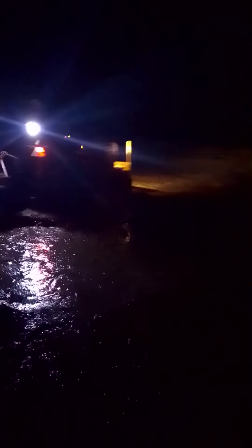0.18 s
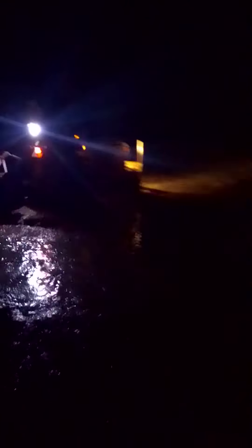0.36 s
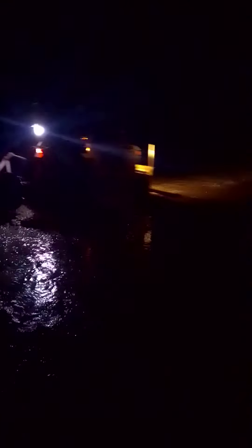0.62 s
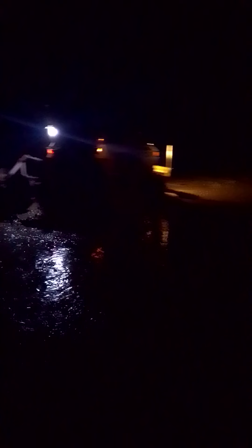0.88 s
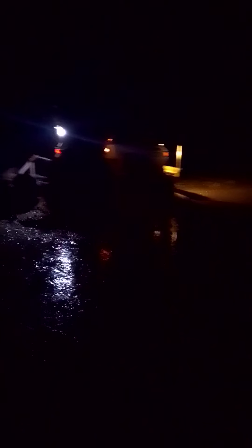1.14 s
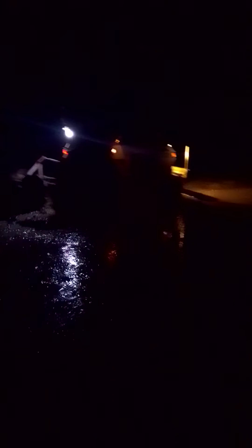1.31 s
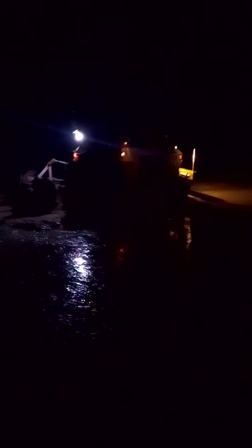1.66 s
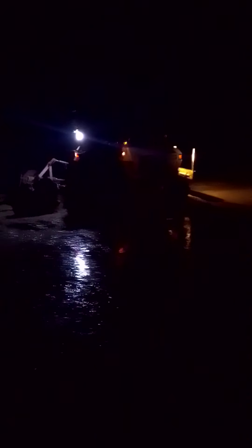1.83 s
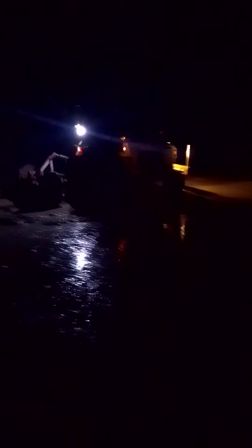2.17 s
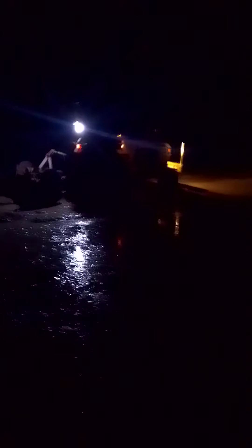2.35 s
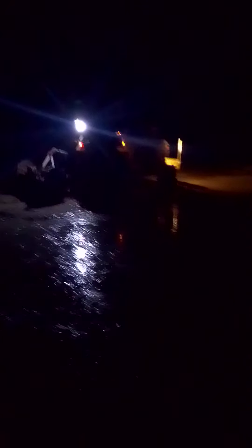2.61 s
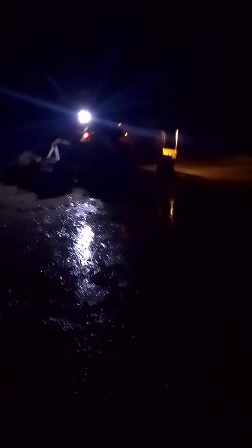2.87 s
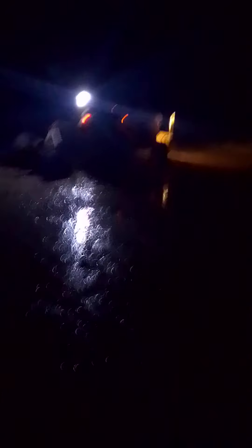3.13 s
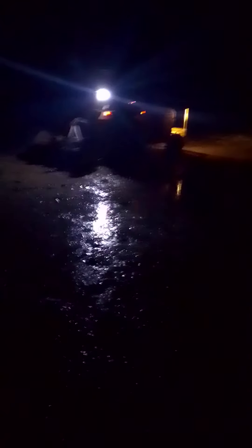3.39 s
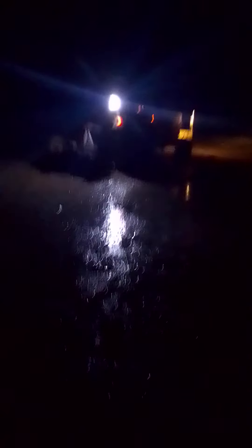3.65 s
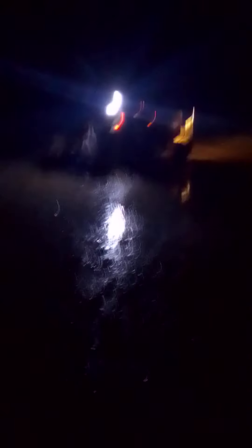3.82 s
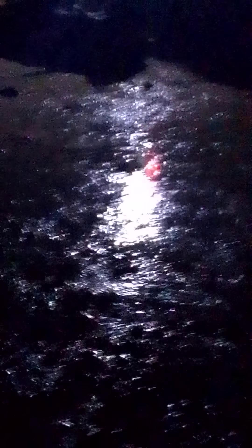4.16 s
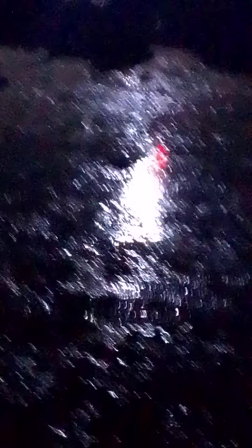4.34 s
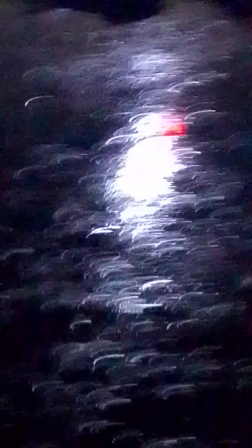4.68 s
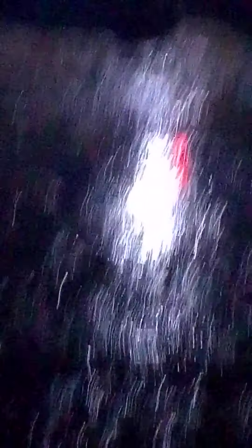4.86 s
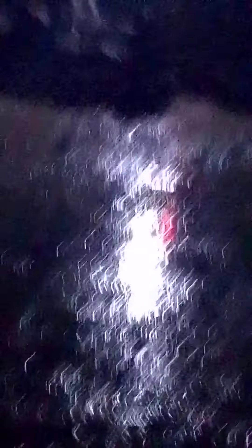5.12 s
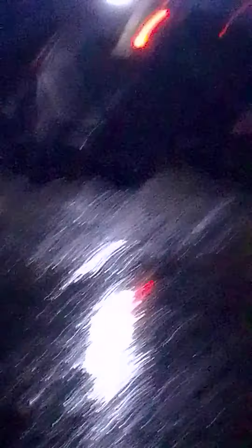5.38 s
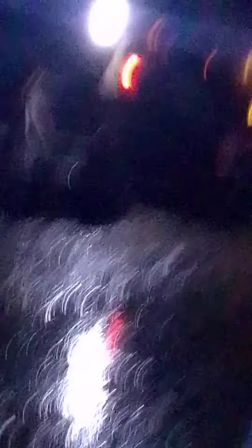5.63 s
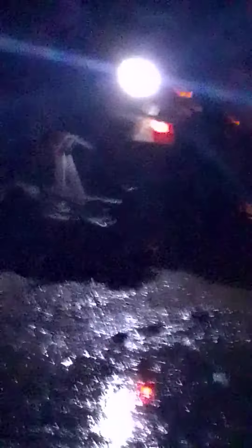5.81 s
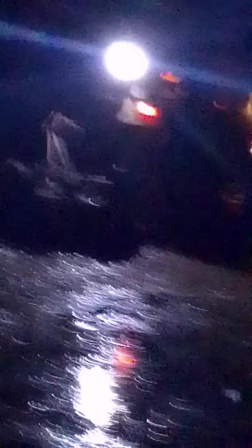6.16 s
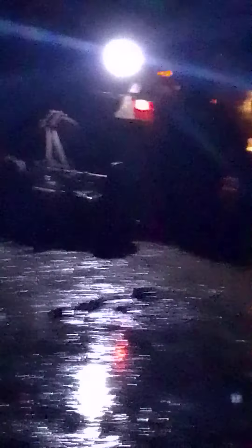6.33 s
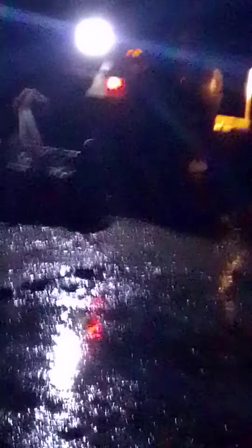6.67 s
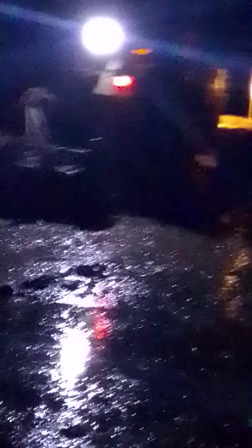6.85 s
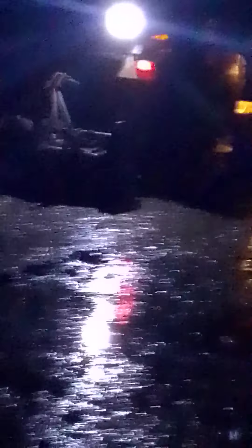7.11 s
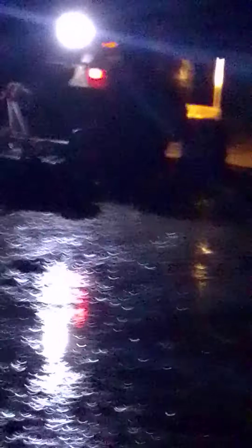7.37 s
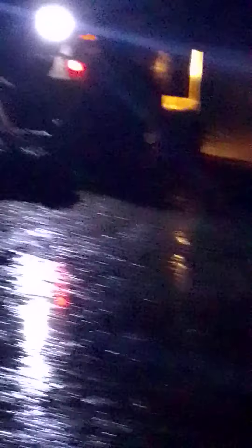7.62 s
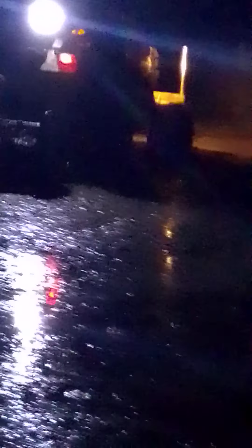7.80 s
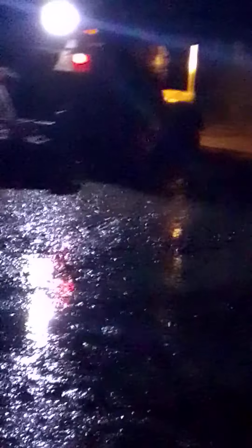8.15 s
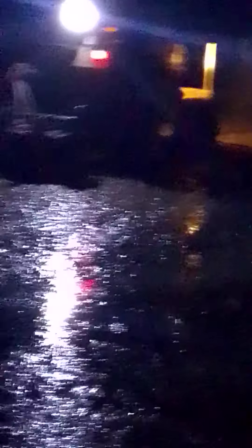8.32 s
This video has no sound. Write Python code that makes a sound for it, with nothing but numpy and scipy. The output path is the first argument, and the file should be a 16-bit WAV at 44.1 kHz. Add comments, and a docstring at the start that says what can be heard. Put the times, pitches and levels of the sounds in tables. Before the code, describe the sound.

Close, rapid diesel engine clatter with rattling metal and sloshing mud, as a tractor tills a flooded field and gradually draws away.

```python
"""Tractor tilling a flooded field

A three-cylinder diesel passes close by at night. Each firing knocks on the engine block, harder when
the speed sags, and puffs from the exhaust. Valves clatter in between and sheet metal rattles.
The tiller churns mud, and the sound grows hollow and dull as the tractor moves on."""
import sys
import numpy as np
from scipy import signal
from scipy.fft import rfft, irfft
from scipy.io import wavfile
from scipy.ndimage import uniform_filter1d

SR = 44100
rng = np.random.default_rng(int(sys.argv[2]) if len(sys.argv) > 2 else 0)


def materialize(psi):
    """Save the field psi as 16-bit PCM at rate SR to the path in sys.argv[1].

    A 1-D psi becomes a single channel; in a 2-D psi each row is a channel.
    """
    bounded = np.clip(np.atleast_2d(psi).T, -1, 1)
    quanta = np.round(bounded * 32767).astype(np.int16)
    wavfile.write(sys.argv[1], SR, quanta)


N = 374409
NOW = np.arange(N) / SR

# how fast the engine runs: (time [s], firings [per s])
ENGINE_SPEED = [(0.0, 32.974), (0.5, 32.937), (0.9, 33.301), (1.4, 32.668), (2.0, 32.632), (2.5, 32.839),
                (2.9, 32.992), (3.4, 32.641), (4.0, 33.054), (4.5, 32.736), (5.0, 32.735), (5.8, 32.597),
                (6.2, 32.95), (6.7, 32.529), (7.2, 32.768), (7.6, 32.845), (7.9, 32.513), (8.49, 32.942)]
def engine_motion(steady_per_s=32.8, fuel_lag_s=0.07):
    """Count the firings so far, and the sag below steady speed that the fuel answers a moment later."""
    speed, = in_time(ENGINE_SPEED)
    return np.cumsum(speed) / SR, steady_per_s - np.interp(NOW - fuel_lag_s, NOW, speed)


# the three cylinders in firing order: (knock level [dB], valve level [dB])
CYLINDERS = [(1.2, 7.5), (-0.74, 8.5), (-1.94, 10.5)]
# firings with an extra sharp crack: (time [s], level [dB])
HARD_KNOCKS = [(0.3822, -30.5), (0.563, -32), (0.7159, -30), (0.8332, -32.5), (0.9286, -32), (1.107, -35),
               (1.1988, -29), (1.2898, -31), (1.5039, -30.5), (1.5967, -26.5), (1.9326, -27.5),
               (2.1167, -28), (2.3, -29.5), (2.9373, -30.5), (3.1197, -29), (3.2133, -30.5), (3.303, -31),
               (3.8228, -33), (4.399, -31), (5.1026, -33), (5.5298, -32.5), (5.7754, -33), (5.839, -31),
               (5.899, -33.5), (6.048, -36), (6.603, -34), (6.6305, -34), (6.717, -36), (7.118, -37.5),
               (7.885, -34.5)]
def knocks(firings, sag, lead_s=0.000838, slap_s=0.0027):
    """Fuel cracks as it lights and the piston slaps after it. Gives ringing power and bare cracks."""
    times = firing_times(firings, delay=0, jitter_s=0.0005)
    db = np.interp(times, NOW, passing_db((-33, -34, -36.5)) + 8 * sag)
    db += np.resize(np.array(CYLINDERS)[:, 0], len(times)) + rng.normal(0, 0.4, len(times))
    extra_db = np.zeros(len(times))
    for time_s, level_db in HARD_KNOCKS:
        nearest = np.argmin(np.abs(times - time_s))
        times[nearest], db[nearest], extra_db[nearest] = time_s, level_db, 6
    starts = times - lead_s  # the metal takes a moment to ring up
    cracks = clicks(starts, from_db(db) ** 2)
    slaps = clicks(times + slap_s, 0.19 * from_db(db) ** 2)
    strike = 1.54 * fading(cracks + slaps, rise_s=0.00027, fall_s=0.0028)
    tail = 0.18 * fading(cracks, rise_s=0.0017, fall_s=0.0057)
    return strike + tail, clicks(starts, from_db(db + extra_db))


# how the block rings: (pitch [Hz], width [Hz], side level [dB], angled level [dB], rear level [dB])
BLOCK_RINGS = [(2466, 224, -6.5, -8.5, 1), (2647, 120, -2.5, -1.5, -6), (2814, 172, -2.5, 4, -1.5),
               (3097, 235, 2.5, 2, -2), (3465, 366, 1, 3, 0), (3744, 314, 4.5, -6.5, 0),
               (4013, 196, -3, -11, -7), (4300, 190, -6, -14, -20), (4730, 220, -8, -10, -2)]
def engine_block(knock_power, cracks, sag):
    """The block rings with each knock, and gears keep it buzzing in between."""
    gear_power = from_db(passing_db((-42, -40, -40)) + sag) ** 2
    return from_db(-0.7) * ring(BLOCK_RINGS, turned_away(), gear_power + knock_power, per_s=9000,
                                blows=5.4 * cracks, wander_db=1.48, order=2)


# how the panels ring: (pitch [Hz], width [Hz], side level [dB], angled level [dB], rear level [dB])
PANEL_RINGS = [(1838, 156, 0, -20.5, -4.5), (2028, 307, 3, -3.5, -6), (2197, 132, -2, 7.5, -25),
               (2356, 140, -3.5, -7, 2)]
# how loudly they rattle: (time [s], level [dB])
PANEL_LEVEL = [(0, -46), (0.8, -42.5), (1.7, -40), (3.75, -42), (4.1, -48.5), (4.75, -44), (5.35, -59),
               (5.9, -50.5), (6.35, -58), (6.7, -48.5), (7.7, -60.5)]
def sheet_metal(beat, tapping):
    """Knocks and valve taps both shake the bonnet and guards."""
    panels = ring(PANEL_RINGS, turned_away(), 1.3 + 0.33 * beat + 0.22 * tapping, per_s=5500)
    return loudness(PANEL_LEVEL) * rms_one(panels)


# taps after each knock: (delay [share of a firing], level [dB])
VALVE_TAPS = [(0.478, 3.5), (0.662, 4.5)]
# how the cover rings: (pitch [Hz], width [Hz], side level [dB], angled level [dB], rear level [dB])
COVER_RINGS = [(973, 92, -6.5, -10, -4), (1050, 80, -10.5, -7, -3.5), (1190, 100, -2, -18, -16),
               (1308, 97, 0.5, -3, 0), (1422, 181, 0, 6, -11.5), (1585, 166, -1, -7, -4.5)]
# how loudly the valves clatter: (time [s], level [dB])
VALVE_LEVEL = [(0, -45.5), (1.7, -44), (4.1, -48), (4.8, -47.5), (5.8, -49), (7.3, -57.5), (7.9, -55),
               (8.49, -56)]
def valve_clatter(firings):
    """Valve parts tap under a thin metal cover. Gives the sound and the pulse of the tapping."""
    taps = repeated_blows(firings, VALVE_TAPS, np.array(CYLINDERS)[:, 1], jitter_s=0.00021, spread_db=3)
    tapping = fading(taps ** 2, rise_s=0.00026, fall_s=0.002)
    tapping /= tapping.mean()
    cover = ring(COVER_RINGS, turned_away(), 0.8 + 0.13 * tapping, per_s=9000, blows=0.55 * taps)
    return loudness(VALVE_LEVEL) * rms_one(cover), tapping


# puffs after each knock: (delay [share of a firing], level [dB])
EXHAUST_PUFFS = [(0.269, 5), (0.781, -9)]
# how the silencer booms: (pitch [Hz], width [Hz], side level [dB], rear level [dB])
SILENCER_RINGS = [(210.3, 33.5, -26.5, -19), (331.5, 52, -19, -3.5), (390.1, 58, -2, -0.5),
                  (441.8, 70, -2, 3), (500, 57, -5, -11.5)]
# how loud the exhaust is: (time [s], level [dB])
EXHAUST_LEVEL = [(0, -47), (0.08, -42.5), (0.2, -46.5), (1.9, -44.5), (3.5, -49.5), (5.3, -52),
                 (6.9, -52.5), (8.49, -55)]
def exhaust(firings):
    """Puffs and swirling gas boom in the silencer."""
    puffs = repeated_blows(firings, EXHAUST_PUFFS, [0], jitter_s=0.00075, spread_db=3.5)
    gas = fading(puffs ** 2, rise_s=0.00047, fall_s=0.0046)
    power = 0.73 + 0.25 * gas / gas.mean()
    boom = ring(SILENCER_RINGS, turned_away(), power, per_s=8000, blows=0.34 * puffs, order=2)
    return loudness(EXHAUST_LEVEL) * rms_one(boom)


# gear and pipe tones: (pitch [times the firing rate], side level [dB], rear level [dB])
WHINE_TONES = [(11.67, -9, -22), (16, -15, -15), (24, -24, -29), (29.1, -18, -30), (30, -15.5, -19),
               (36, -20, -34), (45.2, -22, -17), (50, -23, -29), (55.6, -18, -40), (61.67, -16, -32)]
def whine(firings):
    """Thin tones follow the engine speed, each wavering a little."""
    tones, away = 0, turned_away()
    for multiple, *levels_db in WHINE_TONES:
        gain = from_db(blend(levels_db, away) + 2 * drift(12))
        tones += gain * np.sin(2 * np.pi * (multiple * firings + 0.1 * drift(14)))
    return from_db(passing_db((-43, -43.5, -50.5))) * tones


# the sloshing: (pitch [Hz], width [Hz], side level [dB], angled level [dB], rear level [dB])
MUD_BANDS = [(615, 105, 1.8, -3.5, -24), (766, 147, 0.025, 3, 6), (906, 180, 1.3, -4.5, -10),
             (1305, 510, -3.3, -12, -18), (1584, 320, -2, -3, -12)]
# how the churning rises and falls: (time [s], relative level [dB])
CHURN_LEVEL = [(0.0, -54), (0.07, -55), (1.3, -51.5), (4.7, -56.5), (5.06, -74), (5.25, -60), (5.44, -72),
               (5.79, -59.5), (6.36, -70), (6.57, -77), (6.62, -67.5), (8.49, -71)]
def churned_mud():
    """The tiller blades fling uneven sheets of mud and water."""
    away = turned_away()
    slosh = ring(MUD_BANDS, away, from_db(2.4 * drift(25)), per_s=2500)
    return loudness(CHURN_LEVEL) * from_db(blend((0.3, -1.2, -3), away)) * slosh


# the lowest engine tones: (pitch [times the firing rate], relative level [dB])
HUM_TONES = [(1, -6), (2, 0), (3, 0), (4, -9.5), (6, -13.5)]
# how the odd-numbered tones rise and fall: (time [s], relative level [dB])
ODD_HUM_LEVEL = [(0.0, -83), (0.23, -70), (1.84, -68), (2.1, -73), (2.81, -68), (2.95, -80), (4.02, -75),
                 (4.09, -85), (6.24, -70.5), (7.17, -91), (7.54, -75), (8.49, -79)]
def hum(firings):
    """The firings run together into a low hum whose odd-numbered tones waver most."""
    even_db = passing_db((-66.5, -67.5, -65.5)) + 1.2 * drift(5)
    odd_db = in_time(ODD_HUM_LEVEL)[0] + 3.2 + 2 * drift(14)
    tones = 0
    for multiple, db in HUM_TONES:
        gain = from_db(db + (odd_db if multiple % 2 else even_db))
        tones += gain * np.sin(2 * np.pi * (multiple * firings + rng.random()))
    return tones


# the tone of the hiss: (pitch [Hz], relative level [dB])
HISS_TONE = [(3500, -12), (4800, 4), (5600, -2.5), (7500, 1.5), (9000, 0), (10300, -9), (12500, -10.5),
             (15800, -10.5)]
def treble_hiss(beat, sag):
    """A high hiss pulses with the knocks and grows as the engine sags."""
    db = passing_db((-69.5, -70.5, -71)) + 2.5 * sag + 1.3 * drift(30)
    return from_db(db) * shaped_noise(HISS_TONE) * np.sqrt(1 + 0.33 * beat)


# high ringing: (pitch [Hz], width [Hz], level when dark [dB], level when bright [dB])
SIZZLE_RINGS = [(5000, 330, -3, -10), (5380, 85, 0.5, -15), (6090, 410, 7, -8.5), (6830, 290, 3.5, -16),
                (7800, 280, 7, -5), (8730, 520, 1, 2.5), (9700, 990, -3.5, 1), (11230, 970, -8.5, 4.5),
                (12800, 900, -9.5, 4), (15000, 1000, -7, 1)]
# brief swells of it: (middle [s], length [s], level [dB], brightness [0 to 1])
SIZZLE_SWELLS = [(0.13, 0.2, -69, 0.38), (1.06, 0.16, -81, .95), (1.65, 0.39, -55, 0.089),
                 (2.06, 0.2, -64.5, 0.32), (3.33, 0.21, -70.5, .95), (4.55, 0.22, -72, 0.84),
                 (4.84, 0.22, -74.5, 1), (5.223, .18, -68, .4), (6.747, 0.23, -69.5, .25)]
def sizzle(beat, steady_brightness=0.12, flatness=2.26):
    """A thin ringing throbs with the knocks and swells now and then; bright swells throb least."""
    power = from_db(passing_db((-83, -81, -86))) ** 2
    bright_power = steady_brightness * power
    for middle_s, length_s, db, swell_brightness in SIZZLE_SWELLS:
        swell = from_db(db) ** 2 * np.exp(-np.abs(2 * (NOW - middle_s) / length_s) ** flatness)
        power += swell
        bright_power += swell_brightness * swell
    brightness = bright_power / power
    throb = 0.68 - 0.39 * brightness
    pulse = 1 - throb + throb * beat ** 0.87
    return np.sqrt(power) * ring(SIZZLE_RINGS, brightness, pulse, per_s=12000, order=2)


# single ticks: (time [s], strength [dB])
TICKS = [(.383, -43), (3.03, -49), (3.122, -46)]
def ticks():
    """Tiny bursts of rattling make short, sharp ticks."""
    times, db = np.transpose(TICKS)
    power = fading(clicks(times, from_db(db) ** 2), rise_s=0.0001, fall_s=0.002)
    band = signal.butter(1, [1500, 4000], "band", fs=SR, output="sos")
    return signal.sosfilt(band, rattle(power, per_s=9800))


# the tone of the background: (pitch [Hz], relative level [dB])
FIELD_TONE = [(20, 0), (45, -2), (110, 1), (170, 6.5), (270, -16), (600, -2), (1700, -12.5), (4500, -25.5),
              (16000, -43.5)]
def night_field():
    """A faint, low rush lies under everything."""
    return from_db(-74.5) * shaped_noise(FIELD_TONE)


# which way the tractor faces: (time [s], turn [0 side on to 1 from behind])
TURN = [(1.6, 0.058), (3.2, 0.13), (4.1, 0.33), (5.8, 0.61), (7.0, 0.78), (7.6, 0.95), (8.49, 0.87)]
def turned_away():
    """How far the tractor has turned its back on the listener."""
    return in_time(TURN)[0]


# louder when close, softer when far: (time [s], level change [dB])
NEARNESS = [(0, -0.1), (0.8, -0.4), (1.7, 0.34), (3.2, -0.2), (4.1, -3), (4.7, -2.5), (5.8, -3.0),
            (6.4, -7), (6.65, -5), (7.3, -6), (8.49, -5.9)]
def passing_db(side_angled_rear_db):
    """A part's level follows how near the tractor is and which way it faces."""
    return in_time(NEARNESS)[0] + blend(side_angled_rear_db, turned_away())


# the dip that the echo makes: (time [s], pitch [Hz], depth [dB])
ECHO_DIP = [(0, 1660, -7.5), (1.3, 1680, -1.5), (3.3, 1880, -3.5), (3.7, 1870, -34), (4.7, 1980, -21),
            (5.1, 1900, -12), (5.6, 1580, -21), (6.5, 1670, -14), (7.3, 1695, -16), (8.49, 1590, -20)]
def water_echo(sound, width_hz=475):
    """The echo off the water cancels a shifting band of pitches; a notch filter makes that dip."""
    hz, depth_db = in_time(ECHO_DIP)

    def pair(i, width):
        radius = np.exp(-np.pi * width / SR)
        return [1 / radius, -2 * np.cos(2 * np.pi * hz[i] / SR), radius]

    def notch(i):
        section = np.array(pair(i, width_hz * from_db(depth_db[i])) + pair(i, width_hz))
        return section[None] / section[3]
    return gliding(sound, notch)


# roughly where the clatter's treble ends: (time [s], pitch [Hz])
TREBLE_EDGE = [(0, 4380), (1.1, 4240), (1.6, 4660), (2.3, 4590), (2.7, 4160), (3.6, 4135), (5.15, 3950),
               (5.4, 4270), (6.7, 4170), (7.4, 4120)]
def dulled(sound):
    """Cut the treble just above a slowly moving edge, and again at a steady higher one."""
    edge_hz, = in_time(TREBLE_EDGE)
    sound = gliding(sound, lambda i: signal.cheby1(12, 0.3, edge_hz[i] + 90, fs=SR, output="sos"))
    return signal.sosfilt(signal.butter(10, 5400, fs=SR, output="sos"), sound)


def ring(bands, balance, power, per_s, blows=0, wander_db=0, order=3):
    """Rattling and blows make a part ring in several bands; balance (0 to 1) blends their levels."""
    out, total_power = 0, 0
    for hz, width, *levels_db in bands:
        band = signal.butter(order, [hz - width / 2, hz + width / 2], "band", fs=SR, output="sos")
        gain = from_db(blend(levels_db, balance))
        shaking = rattle(power, per_s) + blows
        if wander_db:
            shaking *= from_db(wander_db * drift(33))
        out += gain * np.sqrt(SR / 2 / width) * signal.sosfilt(band, shaking)
        total_power += gain ** 2
    return out / np.sqrt(total_power)


def firing_times(firings, delay, jitter_s, knock_phase=0.575):
    """One slightly uneven moment per firing, delayed from the knock by a share of a firing."""
    phase = knock_phase + delay
    counts = np.arange(int(firings[-1] - phase) + 1)
    return np.interp(counts + phase, firings, NOW) + jitter_s * rng.standard_normal(len(counts))


def repeated_blows(firings, pattern, cylinder_db, jitter_s, spread_db):
    """Blows that return with every firing, never quite alike."""
    out = 0
    for delay, db in pattern:
        times = firing_times(firings, delay, jitter_s)
        levels_db = db + np.resize(cylinder_db, len(times)) + rng.normal(0, spread_db, len(times))
        out += clicks(times, from_db(levels_db))
    return rms_one(out)


def clicks(times, heights):
    """A one-sample blow at each time."""
    out, at = np.zeros(N), np.round(times * SR).astype(int)
    inside = (at >= 0) & (at < N)
    np.add.at(out, at[inside], heights[inside])
    return out


def fading(power, rise_s, fall_s):
    """Each blow builds up quickly and dies away."""
    rise, fall = np.exp(-1 / (SR * np.array([rise_s, fall_s])))
    return signal.lfilter([1 - rise], np.poly([rise, fall]), power + 1e-18)


def rattle(power, per_s):
    """Countless tiny hits whose average power follows a curve."""
    chance, draw = per_s / SR, rng.uniform(-1, 1, N)
    return np.sqrt(power / chance) * (np.abs(draw) < chance) * np.sign(draw)


def shaped_noise(tone):
    """Noise with the given level at each pitch."""
    hz, db = np.transpose(tone)
    pitches = np.maximum(np.fft.rfftfreq(N, 1 / SR), 1)
    gain = from_db(np.interp(np.log(pitches), np.log(hz), db))
    return rms_one(irfft(rfft(rng.standard_normal(N)) * gain, N))


def gliding(sound, filter_at, step=1024):
    """Run a filter that changes in small steps."""
    out, state = np.zeros(N), np.zeros((len(filter_at(0)), 2))
    for i in range(0, N, step):
        out[i:i + step], state = signal.sosfilt(filter_at(i), sound[i:i + step], zi=state)
    return out


def drift(per_s):
    """A random wander, about 1 in size."""
    points = rng.standard_normal(4000)
    return np.interp(NOW * per_s, np.arange(len(points)), points) / np.sqrt(2 / 3)


def blend(levels_db, position):
    """Slide from the first level (at 0) to the last (at 1)."""
    return np.interp(position, np.linspace(0, 1, len(levels_db)), levels_db)


def in_time(rows):
    """A table's columns at every sample."""
    times, *columns = np.transpose(rows)
    return [np.interp(NOW, times, column) for column in columns]


def loudness(rows):
    """A table of levels as a gain at every sample."""
    return from_db(in_time(rows)[0])


def from_db(db):
    """Decibels to gain."""
    return 10 ** (np.asarray(db) / 20)


def rms_one(sound):
    """Scale to an average power of 1."""
    return sound / np.sqrt(np.mean(sound ** 2) + 1e-20)


def scene():
    """Engine, mud and hiss over the quiet of the field."""
    firings, sag = engine_motion()
    knock_power, cracks = knocks(firings, sag)
    beat = knock_power / (uniform_filter1d(knock_power, size=8000) + 1e-12)  # pulse averaging about 1
    valves, tapping = valve_clatter(firings)
    metal = valves + engine_block(knock_power, cracks, sag) + sheet_metal(beat, tapping)
    engine = metal + exhaust(firings) + whine(firings)
    bass = hum(firings)
    tractor = dulled(water_echo(engine + churned_mud()))
    treble = treble_hiss(beat, sag) + sizzle(beat) + ticks()
    return (tractor + bass + treble + night_field())[None]


def record(dry, cutoff_hz=15900):
    """Cut off the very highest treble."""
    return signal.sosfilt(signal.ellip(12, 0.1, 80, cutoff_hz, fs=SR, output="sos"), dry)


dry = scene()
out = record(dry)
materialize(out)
```